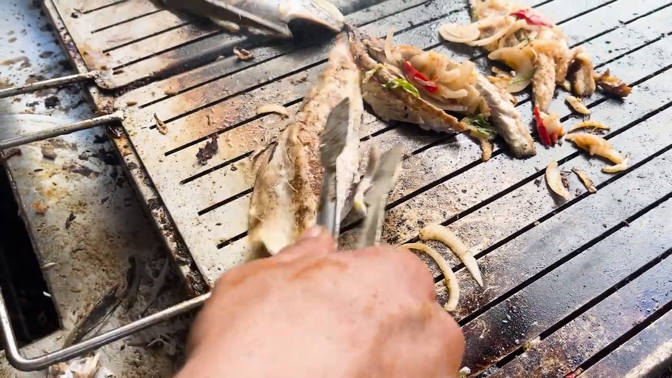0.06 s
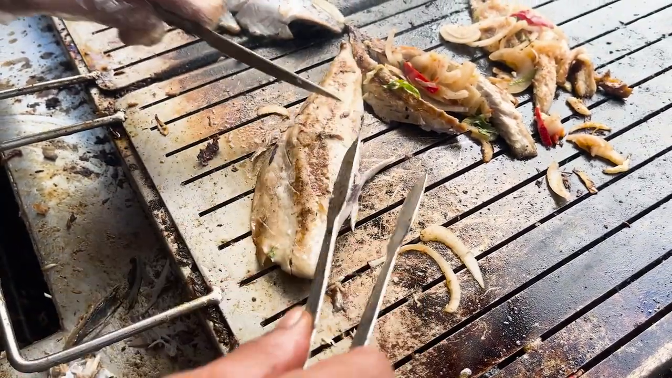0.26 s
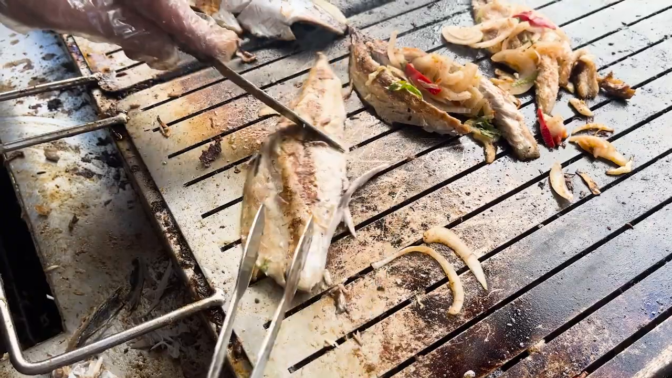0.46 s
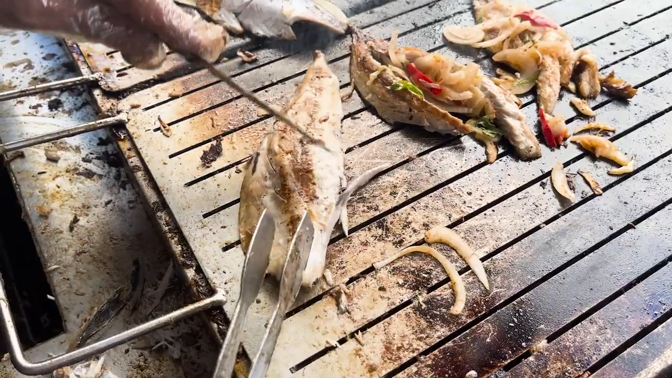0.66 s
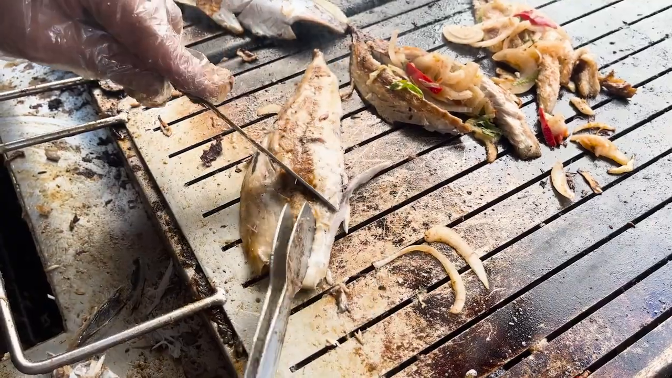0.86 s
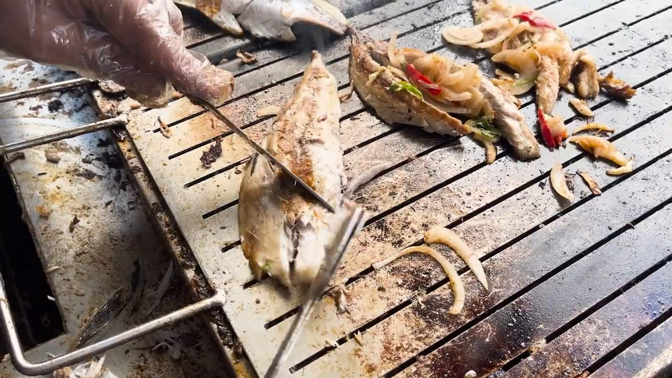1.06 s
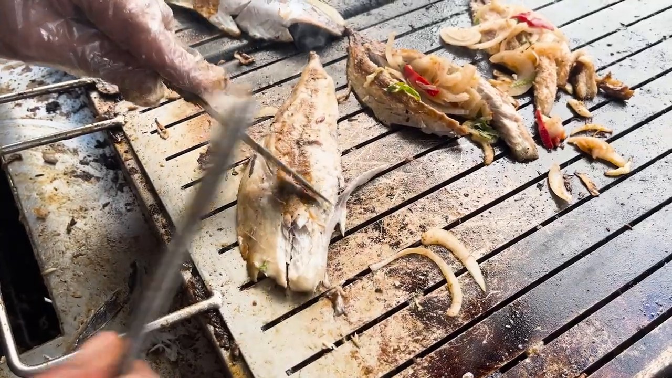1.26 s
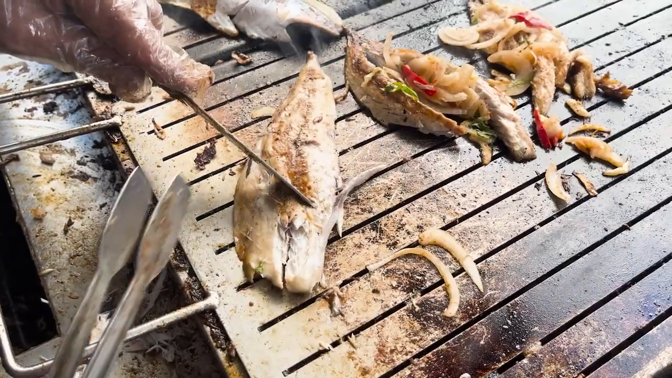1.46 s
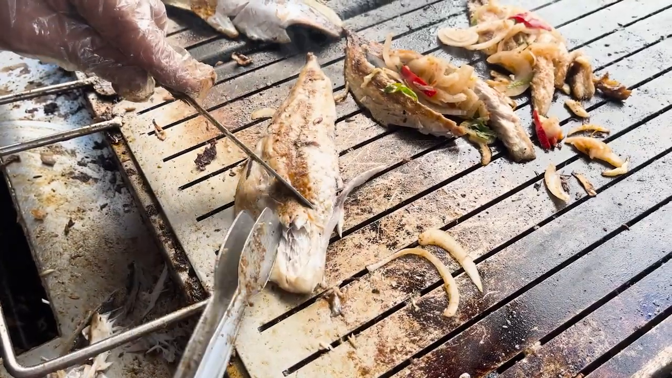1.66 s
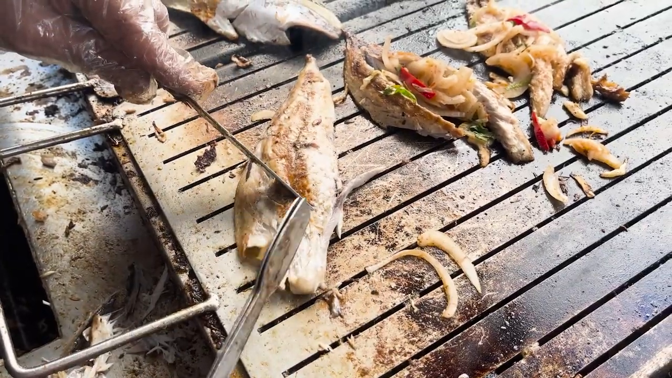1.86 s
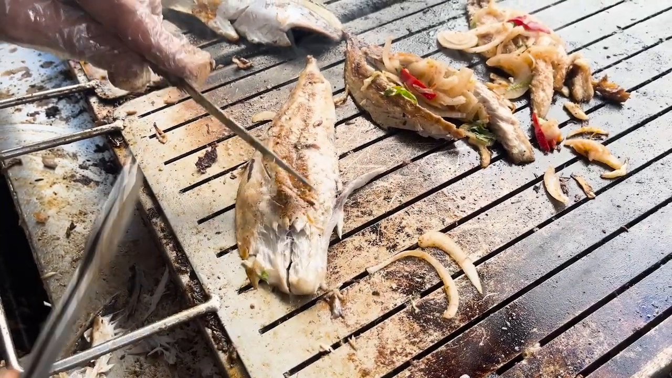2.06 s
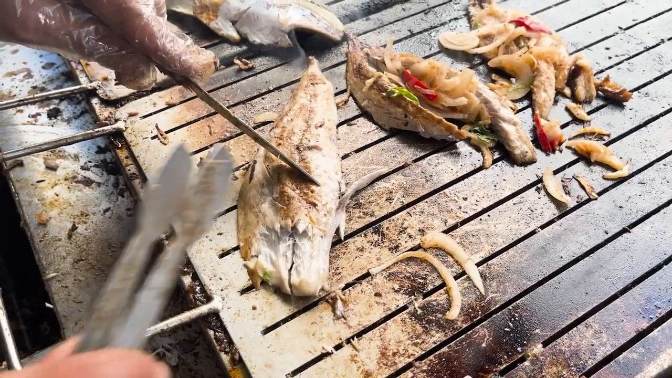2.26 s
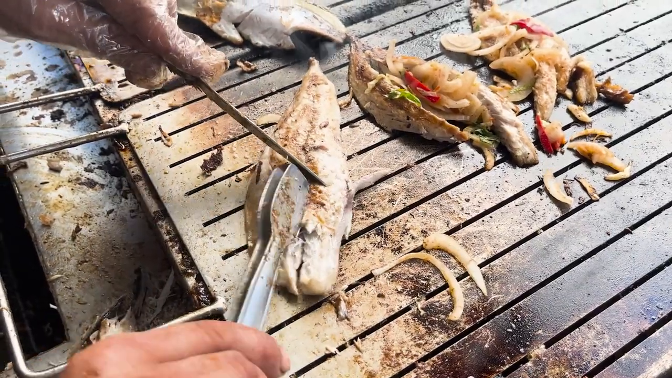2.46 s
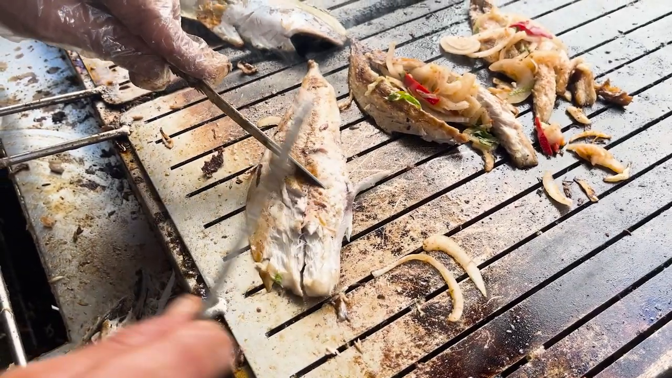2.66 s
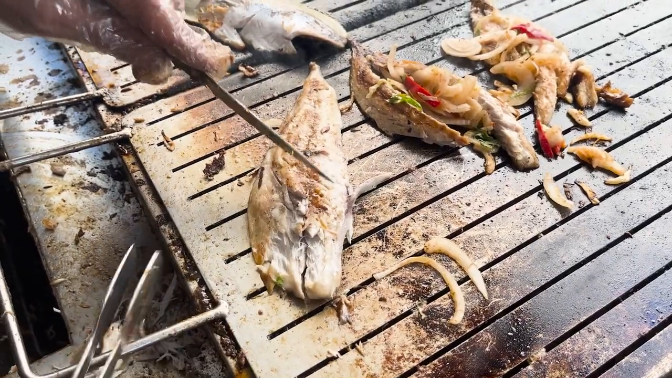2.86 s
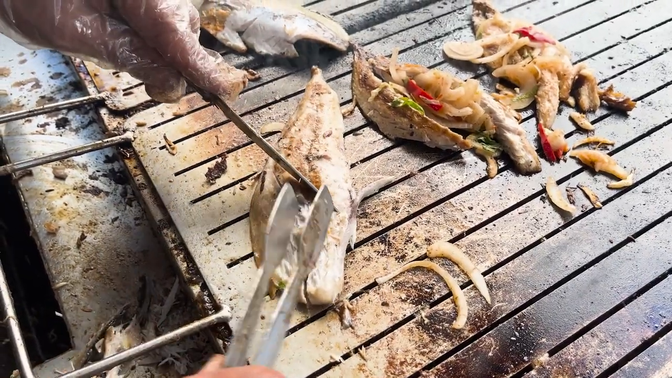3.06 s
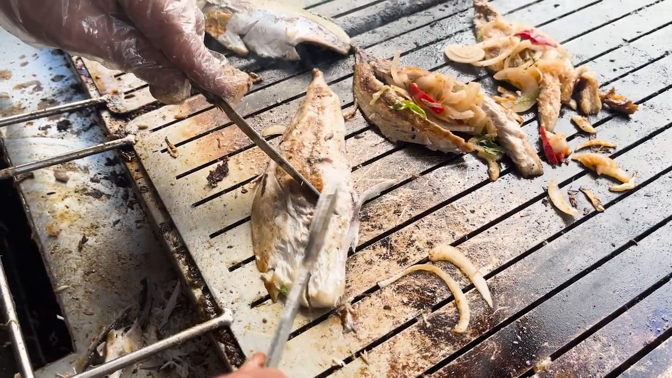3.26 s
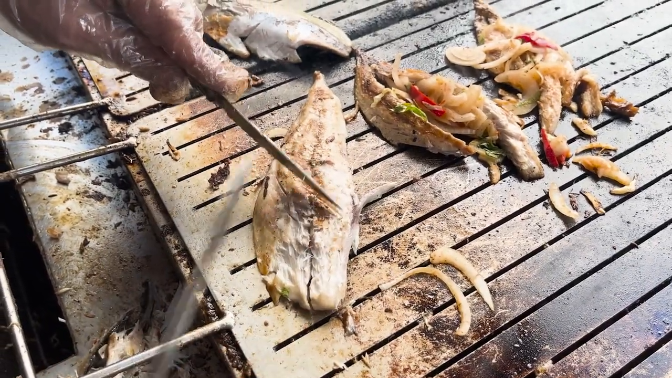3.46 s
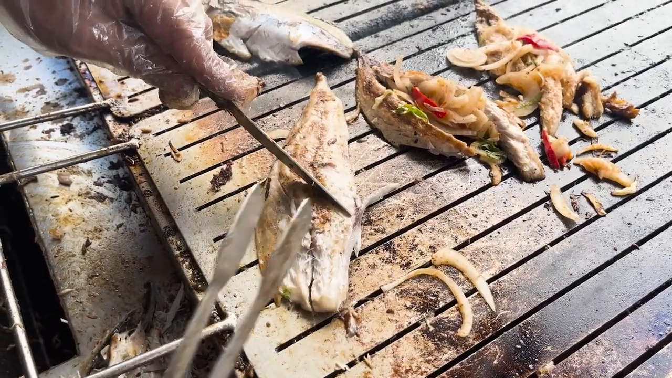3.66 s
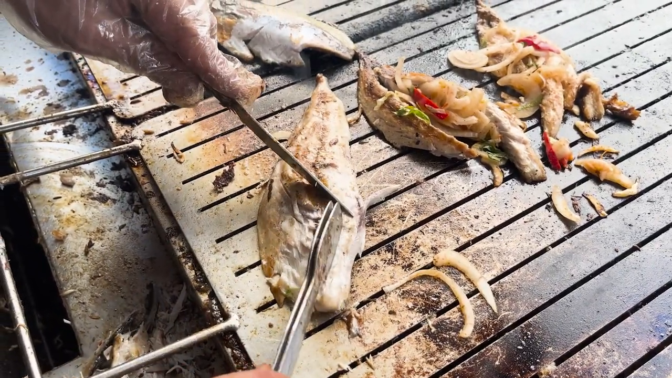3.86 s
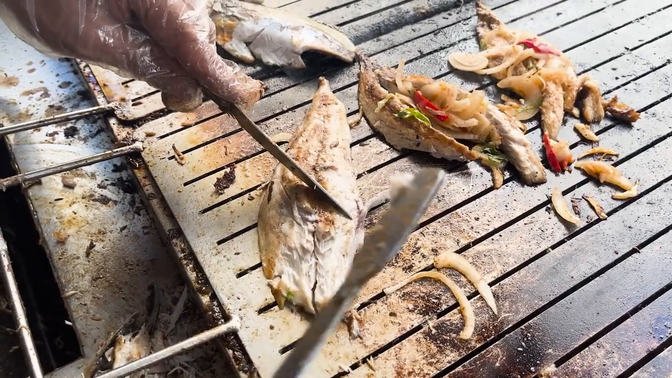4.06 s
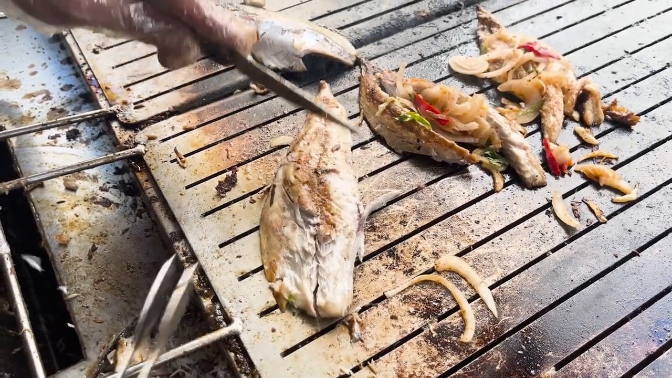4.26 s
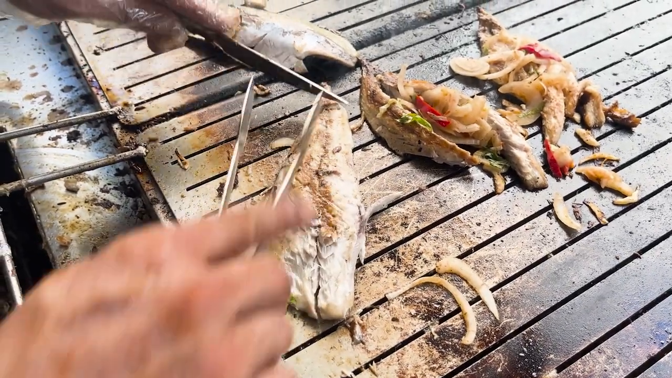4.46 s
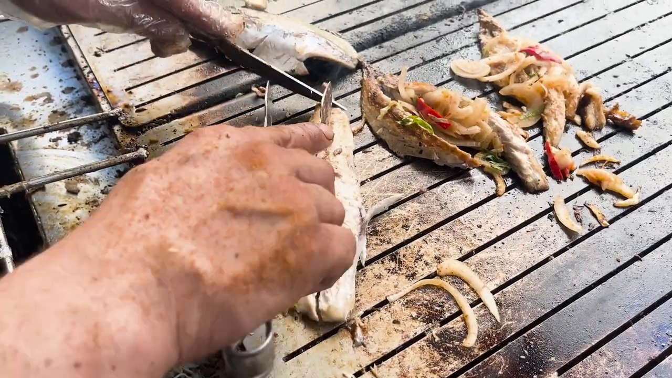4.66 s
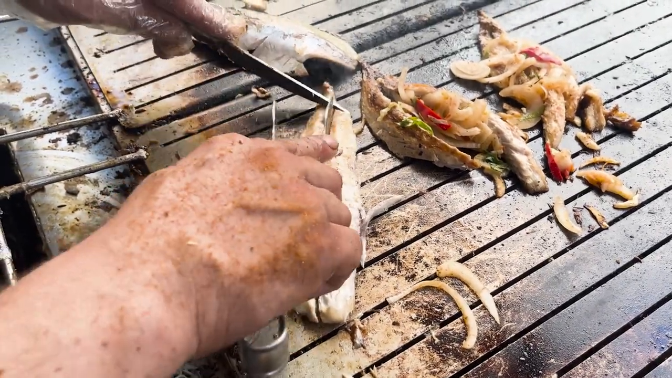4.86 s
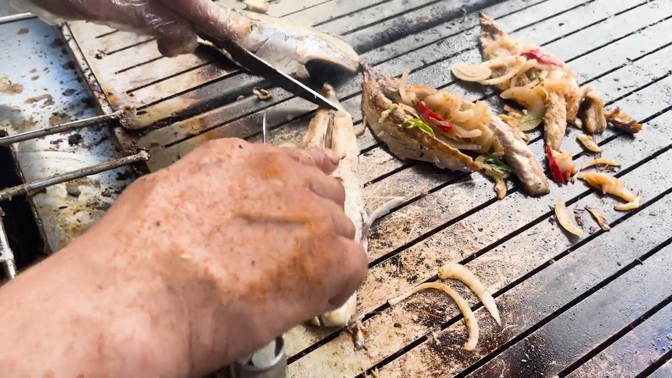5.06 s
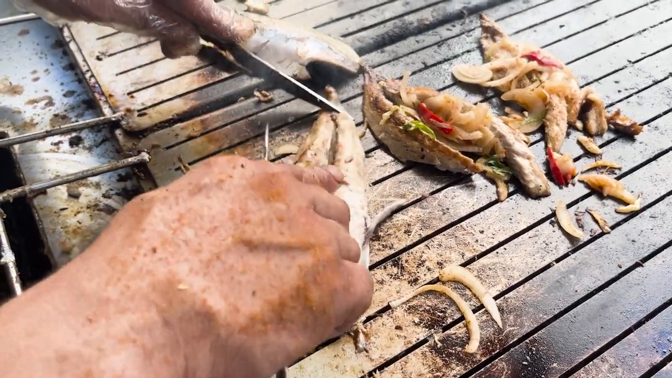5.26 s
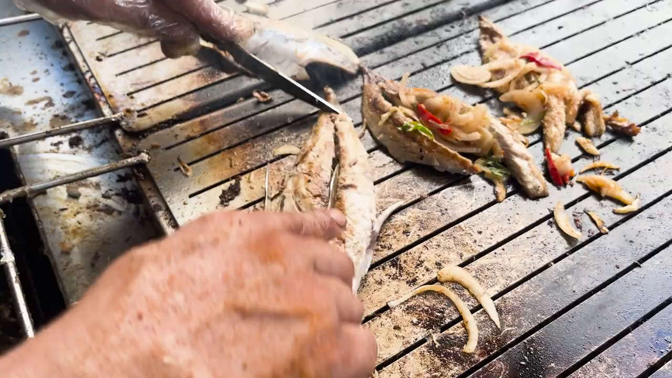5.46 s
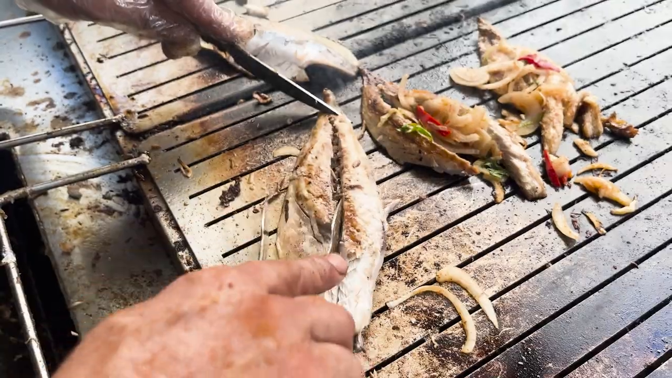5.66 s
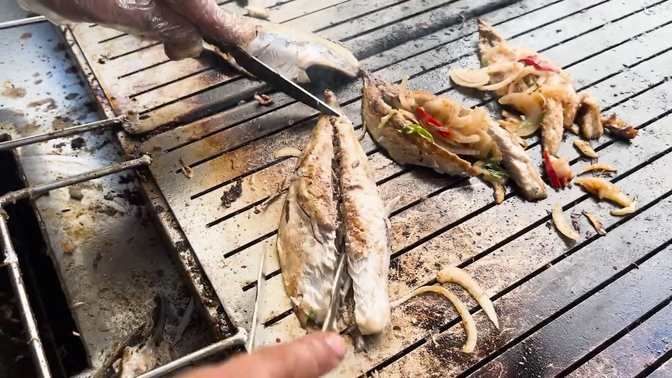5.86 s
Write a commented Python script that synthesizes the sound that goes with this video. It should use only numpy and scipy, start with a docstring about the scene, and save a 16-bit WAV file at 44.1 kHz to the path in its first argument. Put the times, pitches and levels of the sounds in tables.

```python
"""Spring tongs snap shut again and again as fish is split on a steel griddle grate, heard close by.
Each snap is a burst of clattering steel modes and ringing arms; a limiter squashes it.
A knife and the tong tips knock on the grate as noise bursts over ringing modes; drags rasp, one squeaks.
Fat sizzles as dense random grains over hiss, amid sharp bright ticks, of spitting fat or of steel.
Beneath lie a fan's wavering lines and rumble and the dull noise of the street."""
import sys
import numpy as np
from scipy import signal
from scipy.fft import rfft, irfft
from scipy.io import wavfile
from scipy.ndimage import uniform_filter1d, minimum_filter1d

SR = 44100
rng = np.random.default_rng(int(sys.argv[2]) if len(sys.argv) > 2 else 0)


def generate_wav(signal):
    """Clip the signal to [-1, 1] and save it as 16-bit WAV at the path in sys.argv[1]."""
    frames = np.transpose(np.atleast_2d(signal))
    scaled = np.clip(frames, -1, 1) * 32767
    pcm = np.round(scaled).astype(np.int16)
    wavfile.write(sys.argv[1], SR, pcm)


N = 261072
TIME = np.arange(N) / SR
HIT = 16000  # samples that one blow lasts
AGE = np.arange(HIT) / SR  # seconds since the blow

# Levels are relative, ahead of the stereo balance and limiter; every colour has its overall level set apart.

# groups of tong modes that the point of contact favours or mutes: pitch_hz
CONTACT_HZ = (780, 1400, 1780, 2250, 2800, 5200, 7000, 11000)
# tongs snapping shut: start_s, level_db, rattle_delay_s, rattle_db (against the snap),
# singing_mode_hz, singing_lift_db, then one contact_db for each group in CONTACT_HZ
SNAPS = [(0.009, -25, .003, -6, 1305, 11, -11, 5, 3, -15, -10, -2, 8, 5),
         (1.3573, -5.5, 0.0038, 5.5, 2262, 5.8, 1, 2.5, 0, 0.5, -7, -4, 3, 0),
         (2.11, -6, 0.0013, 5, 1700, 2.7, -5, 3, 1, 3.5, -6, -2.5, 0, 4.5),
         (2.823, -5, 0.0017, 4.5, 2262, 6.1, -2.5, 3.5, -8, 0.5, -9.5, -6, 0.5, -3.5),
         (3.526, -8, 0.0019, 9.5, 5388, 6.3, -0.5, -0.5, 1, -15, -2, 2, 0, 0.5),
         (4.204, -4.5, 0.0033, 9.5, 1785, 2.5, -4.5, 2, 1.5, -4.5, -1, -7, 3, -2.5)]
# ring of the tong arms, before contact and chance: pitch_hz, level_db, t60_s
TONG_MODES = [(692, -28, 0.27), (770, -21, 0.26), (836, -21, 0.15), (1050, -34, 0.26), (1342, -25, 0.28),
              (1402, -17, 0.14), (1490, -20, 0.14), (1702, -20, 0.14), (1804, -16.5, 0.25),
              (1873, -23, 0.19), (1960, -23, 0.15), (2122, -15, 0.14), (2220, -24, 0.2), (2357, -34, .16),
              (2480, -24, 0.11), (2744, -15, 0.16), (2920, -14, 0.16), (3100, -43, 0.17),
              (4456, -24.5, 0.2), (5020, -16, .12), (5388, -22, 0.2), (5610, -30, .13), (6360, -19.5, 0.15),
              (7044, -14.5, 0.087)]
# dense clatter of the thin steel: pitch_hz, density_db (per Hz)
CLATTER_COLOUR = [(150, 3.5), (280, -29), (520, -15), (780, -3.5), (1120, -16), (1450, 4), (1800, 2.5),
                  (2200, 0), (2750, -1.5), (3400, -9.5), (4400, -10.5), (5400, -3.5), (8000, -9.5),
                  (12000, -4.5), (16000, -17.5)]
# knife and tong tips on the grate: start_s, level_db, hardness_db (treble gained and bass lost),
# clack_db, t60_s (of the thud and clack), favoured_pitch_hz
KNOCKS = [(2.369, -38.5, -1.5, 9.5, 0.063, 1900), (2.672, -35.5, -7, 5.5, 0.032, 850),
          (2.73, -26.5, -1.5, 7.5, 0.11, 1300), (3.006, -37, -2.5, -3, 0.044, 1270),
          (3.897, -43, -6.5, 0, .06, 1300), (3.993, -29.5, -3.5, 3, 0.21, 1280),
          (4.024, -39.5, -6, 7, .06, 1750), (4.9222, -29, -11, 1.5, 0.047, 850),
          (5.0203, -34, -4.5, 6, 0.048, 1770), (5.024, -38.5, -10.5, -12, 0.043, 684),
          (5.126, -37.5, -13.5, -2, 0.068, 724), (5.143, -27.5, 0, -7, 0.055, 720),
          (5.275, -39, 6.5, -1, 0.076, 1250), (5.321, -29, 1.5, -0.5, 0.051, 1740),
          (5.482, -21.5, 5, -4.5, 0.068, 1740), (5.621, -26.5, 6, -3, 0.062, 1700),
          (5.764, -21, 5, -4.5, 0.04, 460), (5.882, -34, 3, 4.5, 0.01, 1760)]
# ring of the grate, before the favoured pitch and chance: pitch_hz, level_db, t60_s
GRATE_MODES = [(474, -3.5, 0.13), (596, -7.5, 0.11), (720, -13, 0.15), (940, -7, 0.073), (1200, -10, 0.16),
               (1590, -13, 0.035), (1740, -7, 0.11), (2626, -11, 0.066)]
# the three parts of a knock (the thud also serves the tongs): pitch_hz, density_db (per Hz)
THUD_COLOUR = [(120, 0.5), (290, 5), (450, 0), (800, -6), (1700, -3.5), (3000, -10), (8000, -18.5)]
CLACK_COLOUR = [(600, -19), (2000, 5.5), (5500, 4.5), (7500, 4.5), (11000, -5.5)]
TICK_COLOUR = [(3000, -52), (7000, -4.5), (11000, 1), (16000, -9)]
# steel dragged over the grate: start_s, end_s, level_db (at the middle)
SCRAPES = [(0.644, 0.765, -41.5), (2.594, 2.775, -32), (3.578, 3.76, -42.5), (3.886, 4.157, -38),
           (4.346, 4.473, -42), (4.862, 4.936, -38)]
# rasp of a scrape: pitch_hz, density_db (per Hz)
SCRAPE_COLOUR = [(200, 4), (550, 14), (1300, 5.5), (2800, -4), (7000, -18), (15000, -49)]
# sharp bright ticks, of spitting fat or of steel: start_s, peak_db, t60_s
BRIGHT_TICKS = [(.066, -6, 0.0046), (1.148, -10, 0.004), (2.428, -9.5, 0.006), (2.493, -8, .004),
                (2.5165, -6.5, 0.0031), (3.461, -15.5, .008), (3.483, -16, .007), (4.545, -6, 0.005),
                (5.214, -19, .004)]
# colour of a bright tick: pitch_hz, density_db (per Hz)
BRIGHT_COLOUR = [(1500, -6), (5000, -20), (8000, 16), (11500, 11), (16000, 11)]
# colours of the sizzle, the fan's rumble and the street: pitch_hz, density_db (per Hz)
SIZZLE_COLOUR = [(1000, -22), (2500, -5.5), (5000, -3.5), (7000, 2), (9000, 5), (11000, 6.5), (14000, 2.5),
                 (16000, -4.5)]
RUMBLE_COLOUR = [(18, -26), (27, -25), (36, -1), (60, 3), (90, 1.5), (130, -8.5), (165, -0.5), (200, -15),
                 (400, -30)]
STREET_COLOUR = [(100, 0), (300, -0.5), (500, -3), (900, -9.5), (1500, -12.5), (2200, -18.5), (6000, -61),
                 (14000, -21)]
# sizzling fat, before the trim and slow swell: time_s, level_db
FRYING = [(0.0, -35.5), (0.26, -38.5), (2.7, -39.5), (2.85, -45.5), (3.86, -45.5), (4.44, -40),
          (4.68, -38.5), (5.92, -43)]
# fan lines: pitch_hz, level_db, width_hz (rate of their waver)
FAN_LINES = [(64.5, -37.5, 8.3), (99.3, -42.5, 3.2), (161.8, -44, 16.4), (228, -50.5, 4.6),
             (314.6, -53.5, 28), (462, -55, 12.5)]
# low bumps and faint hollow tones that come and go: middle_s, pitch_hz (before the waver), level_db, length_s
SWELLS = [(1.698, 64.2, -20.5, .1), (1.786, 280, -31, 0.048), (2.36, 66.6, -26.5, .16),
          (2.846, 71, -15.5, .05), (3.013, 364.4, -30, .12), (3.322, 320, -35, .08),
          (3.728, 335.5, -34.5, .17), (3.99, 88, -15, .06)]
# microphone pair, likeness of diffuse sound: pitch_hz, likeness (0 to 1)
LIKENESS = [(60, 1), (150, 0.96), (350, 0.52), (800, 0.012), (1400, 0.015), (2000, 0.83), (3800, 0.21),
            (5500, 0.38), (7800, 1), (15000, 1)]
# microphone pair, level balance: pitch_hz, left_minus_right_db
BALANCE = [(60, 2), (200, 2.5), (750, 3.5), (1400, 1), (2400, 2), (4300, 7), (7500, 0.5), (15000, -0.5)]
# microphone pair, phase: pitch_hz, left_lead_rad
PORT_PHASE = [(20, 0), (400, .15), (700, .8), (1300, -.9), (1800, .3), (3200, 1.1), (4900, .7), (5800, -1),
              (7200, -1.9), (8000, -3), (8700, -3.3), (11500, -6.2), (12400, -6.4), (15600, -9.4)]

CLATTER_T60_S, STALL_T60_S = 0.035, 0.21
CUTOFF_HZ = 15750
# small random spits: average number a second, typical peak above the sizzle and its spread
SPITS_PER_S, SPIT_OVER_DB, SPIT_SPREAD_DB = 6, 18.5, 3
# the fan's rumble starts at this level and eases off steadily
RUMBLE_DB, RUMBLE_FALL_DB_PER_S = -32, 1.0
# a short echo of each snap off a near surface, at a level against that snap
ECHO_S, ECHO_DB = 0.017, -9.5
# the blade squeaks once on a bar; the pitch rises most under the greatest pressure
SQUEAK_S, SQUEAK_LENGTH_S, SQUEAK_DB = 5.416, 0.031, -36
SQUEAK_HZ, SQUEAK_RISE_HZ = 1050, 300


def from_db(db):
    """Decibels to gain."""
    return 10 ** (np.asarray(db) / 20)


def rms_one(x):
    """Scale to rms 1."""
    return x / np.sqrt(np.mean(x ** 2) + 1e-20)


def at_hz(points, hz):
    """Read a table on a log-frequency axis."""
    known_hz, values = np.transpose(points)
    return np.interp(np.log(hz + 1e-3), np.log(known_hz), values)


def bins(size):
    """Frequencies of an FFT of this size."""
    return np.fft.rfftfreq(size, 1 / SR)


def coloured(x, spectrum):
    """Give x a spectrum; rms 1."""
    size = x.shape[-1]
    gain = from_db(at_hz(spectrum, bins(size)))
    return rms_one(irfft(rfft(x) * gain, size))


def diffuse(spectrum, size):
    """Stereo noise from all sides: the ports share more of it where their likeness is high; rms 1."""
    mid, side = rfft(rng.standard_normal((2, size)))
    alike = np.clip(at_hz(LIKENESS, bins(size)), 0, .999)
    shared = np.sqrt(1 + alike) * mid
    opposed = np.sqrt(1 - alike) * side * [[1], [-1]]
    return coloured(irfft(shared + opposed, size), spectrum)


def drift(rate_hz):
    """Slow chance with rms 1, made of noise that fades out above rate_hz."""
    slowness = (1 + (bins(N) / rate_hz) ** 2) ** 2
    return rms_one(irfft(rfft(rng.standard_normal(N)) / slowness, N))


def decay(t60):
    """Envelope of one blow that falls 60 dB in t60 seconds."""
    return from_db(-60 * AGE / max(t60, 1e-3))


def add(out, s, sound):
    """Mix a sound in at time s."""
    start = max(round(s * SR), 0)
    out[:, start:start + sound.shape[-1]] += sound[..., :N - start]


def blow(spectrum, t60, room_db, colour=((1000, 0),), uneven_db=4.0, cluster_hz=55):
    """A burst of clustered steel modes, coloured by the contact, then the stall's short reverberation."""
    cluster_centres = np.arange(50, SR / 2, cluster_hz)
    chance = np.clip(rng.standard_normal(1000)[:len(cluster_centres)], -2, 2)
    lumps_db = uneven_db * chance * np.minimum(cluster_centres / 2800, 1)  # smoother in the bass
    hz = bins(HIT)[1:]
    density_db = at_hz(spectrum, hz) + np.interp(hz, cluster_centres, lumps_db) + at_hz(colour, hz)
    clustered = np.column_stack([hz, density_db])
    direct = coloured(rng.standard_normal(HIT), clustered) * decay(t60) * (1 - decay(0.00076))
    room = diffuse(clustered, HIT) * decay(STALL_T60_S) * (1 - decay(0.048))
    return direct + from_db(room_db) * room


def ring(modes, colour, spread_db, detune, port_spread=1.0):
    """The point of contact sets how hard each mode rings; reflections shift its phase between the ports."""
    hz, level_db, t60 = np.transpose(modes)
    gain = from_db(level_db + at_hz(colour, hz) + spread_db * rng.standard_normal(len(hz)))
    hz = hz * (1 + detune * rng.standard_normal(len(hz)))
    phase = rng.uniform(0, 2 * np.pi, (len(hz), 1))
    phase = phase + port_spread * rng.standard_normal((2, len(hz), 1))
    tails = np.array([g * decay(t) for g, t in zip(gain, t60)])
    return np.sum(tails * np.sin(2 * np.pi * hz[:, None] * AGE + phase), axis=1)


def hum(rumble_db, street_db=-42, waver=0.062):
    """Fan lines with wavering level and phase, and hollow swells, over rumble and the street's dull wash."""
    rumble = from_db(rumble_db) * diffuse(RUMBLE_COLOUR, N)
    street = from_db(street_db + 1.8 * drift(30)) * diffuse(STREET_COLOUR, N)
    out = rumble + street
    for hz, level_db, width_hz in FAN_LINES:
        turn = 2 * np.pi * hz * TIME
        line = drift(width_hz) * np.cos(turn) + drift(width_hz) * np.sin(turn)
        out = out + from_db(level_db) * line
    bend = 1 + waver * drift(104)
    for middle_s, hz, level_db, length_s in SWELLS:
        size = max(int(length_s * SR), 2)
        pitch_hz = hz * bend[int(middle_s * SR):][:size]
        tone = np.sin(2 * np.pi * np.cumsum(pitch_hz) / SR)
        add(out, middle_s - length_s / 2, from_db(level_db) * np.hanning(size) * tone)
    return out


def sizzle(level_db, per_s=1800, size_db=5.5, grain_db=-3, hiss_db=0):
    """Tiny bursts of steam in the fat, in clumps, over the hiss of countless smaller ones."""
    born = rng.random(N) < per_s * from_db(4 * drift(25)) / SR
    sizes = from_db(size_db * np.minimum(rng.exponential(1, N), 4.5)) * rng.choice([-1, 1], N)
    grains = from_db(grain_db) * coloured(born * sizes, SIZZLE_COLOUR)
    hiss = from_db(hiss_db + 2.3 * drift(32)) * diffuse(SIZZLE_COLOUR, N)
    return from_db(level_db) * (grains + hiss)


def tong_resonances(width_hz=26, valley_db=-12.0):
    """The clatter gathers around the modes of the arms, with dark valleys between: pitch_hz, level_db."""
    hz = np.arange(500, 7500, 15)
    power = from_db(valley_db) ** 2
    for mode_hz, _, _ in TONG_MODES:
        mode_width_hz = width_hz * np.sqrt(mode_hz / 2000)
        power = power + 1 / (1 + ((hz - mode_hz) / mode_width_hz) ** 2) ** 2
    return hz, 10 * np.log10(power / uniform_filter1d(power, size=50))  # against the local average


def tongs(room_db=-17, ring_db=2.0, thud_db=-13.5, close_s=0.0042, rattle_t60=0.026,
          sing_width_hz=35, lead_in_s=0.007, lead_in_db=-10, lead_in_clatter_db=-8):
    """A soft, quickly swelling onset leads into each snap; the tips rattle, an echo follows, the arms ring."""
    out = np.zeros((2, N))
    grid_hz, resonance_db = tong_resonances()
    for s, level_db, rattle_s, rattle_db, sing_hz, sing_db, *contact_db in SNAPS:
        contact = list(zip(CONTACT_HZ, contact_db))

        def lift(hz):
            """Decibels added close to the singing mode."""
            return sing_db * (abs(hz - sing_hz) < sing_width_hz)

        colour_db = at_hz(contact, grid_hz) + resonance_db + lift(grid_hz)
        colour = [*zip(grid_hz, colour_db), contact[-1]]
        lifted_modes = [(hz, db + lift(hz), t60) for hz, db, t60 in TONG_MODES]
        arms = from_db(ring_db) * ring(lifted_modes, contact, spread_db=1.0, detune=0.0014)
        thud = from_db(thud_db) * blow(THUD_COLOUR, t60=0.041, room_db=6.5)
        clatter = blow(CLATTER_COLOUR, CLATTER_T60_S, room_db, colour)
        soft_clatter = from_db(lead_in_clatter_db) * blow(CLATTER_COLOUR, CLATTER_T60_S, room_db, colour)
        lead_in = (soft_clatter + arms) * (1 - decay(0.019))
        closing = (clatter + arms + thud) * (1 - decay(close_s))
        rattle = blow(CLATTER_COLOUR, rattle_t60, room_db=-31, colour=colour)
        echo = blow(CLATTER_COLOUR, t60=0.055, room_db=-7.0, colour=colour)
        add(out, s - lead_in_s, from_db(level_db + lead_in_db) * lead_in)
        add(out, s, from_db(level_db) * closing)
        add(out, s + rattle_s, from_db(level_db + rattle_db) * rattle)
        add(out, s + ECHO_S, from_db(level_db + ECHO_DB) * echo)
    return out


def bright_ticks(sizzle_db, small_t60=0.0023):
    """Sharp bright ticks, of spitting fat or of steel, and small random spits that grow with the sizzle."""
    out = np.zeros((2, N))
    born = np.flatnonzero(rng.random(N) < SPITS_PER_S / SR)
    small_db = sizzle_db + SPIT_OVER_DB + SPIT_SPREAD_DB * rng.standard_normal(N)
    small_spits = [(TIME[i], small_db[i], small_t60) for i in born]
    for s, peak_db, t60 in [*BRIGHT_TICKS, *small_spits]:
        tick = coloured(rng.standard_normal(HIT), BRIGHT_COLOUR) * decay(t60)
        add(out, s, from_db(peak_db) * tick / np.abs(tick).max())
    return out


def scrapes(slip_db=3):
    """Each stroke swells and fades while the edge sticks and slips, heard as noise of uneven level."""
    pressure = np.zeros(N)
    for start_s, end_s, level_db in SCRAPES:
        progress = np.clip((TIME - start_s) / (end_s - start_s), 0, 1)
        pressure += from_db(level_db) * np.sin(np.pi * progress)
    stick_slip = rms_one(from_db(slip_db * drift(97)))
    return pressure * stick_slip * diffuse(SCRAPE_COLOUR, N)


def knocks(dull_db=-6.0, ring_db=0.5, tick_db=1.0, crack_db=3, crack_t60=0.041,
           favour_db=5.5, favour_ratio=1.25, build_s=0.0089):
    """Through the flesh the blade thuds, its edge clacks on the bars, and bare steel cracks and ticks."""
    out = np.zeros((2, N))
    for s, level_db, hard_db, clack_db, t60, pitch_hz in KNOCKS:
        colour = [(pitch_hz / favour_ratio, 0), (pitch_hz, favour_db), (pitch_hz * favour_ratio, 0)]
        grate = ring(GRATE_MODES, colour, spread_db=0.0, detune=0.016) * (1 - decay(build_s))
        thud = blow(THUD_COLOUR, t60, room_db=1.5, colour=colour, uneven_db=-2.5)
        body = from_db(dull_db) * thud + from_db(ring_db) * grate
        clack = from_db(clack_db) * blow(CLACK_COLOUR, t60, room_db=-4.5, uneven_db=4.5)
        tick = from_db(tick_db) * blow(TICK_COLOUR, t60, room_db=-15.0)
        crack = from_db(crack_db) * coloured(rng.standard_normal(HIT), TICK_COLOUR) * decay(crack_t60)
        knock = from_db(-hard_db) * body + clack + from_db(hard_db) * (tick + crack)
        add(out, s, from_db(level_db) * knock)
    return out


def squeak(rough_hz=240):
    """Fast, uneven slips of the edge; their rate rises and falls with the pressure."""
    pressure = np.sin(np.pi * np.clip((TIME - SQUEAK_S) / SQUEAK_LENGTH_S, 0, 1))
    hz = SQUEAK_HZ + SQUEAK_RISE_HZ * pressure + rough_hz * drift(385)
    return from_db(SQUEAK_DB) * pressure * np.sin(2 * np.pi * np.cumsum(hz) / SR)


def scene(sizzle_trim_db=1.0, swell_db=-0.1):
    """Tongs and knife at work over the fan and the frying fat, whose sizzle swells and ebbs."""
    frying_db = np.interp(TIME, *np.transpose(FRYING))
    sizzle_db = frying_db + sizzle_trim_db + swell_db * drift(5.0)
    rumble_db = RUMBLE_DB - RUMBLE_FALL_DB_PER_S * TIME
    stall = hum(rumble_db) + sizzle(sizzle_db)
    return stall + tongs() + bright_ticks(sizzle_db) + scrapes() + knocks() + squeak()


def limiter(x, top_db=-4.5, hold_s=0.0059, release_db_per_s=1100, slow_share=0.12, slow_db_per_s=45):
    """Peaks pull the gain down at once; most of it returns after a short hold, the rest slowly."""
    over_db = np.maximum(20 * np.log10(np.abs(x).max(axis=0) + 1e-9) - top_db, 0)
    size = max(int(hold_s * SR), 3)
    held = -minimum_filter1d(-over_db, size, origin=(size - 1) // 2)  # highest of the recent peaks

    def release(db_per_s):
        """Follow rises at once and fall at a steady rate."""
        return np.maximum.accumulate(held + db_per_s * TIME) - db_per_s * TIME

    reduction_db = (1 - slow_share) * release(release_db_per_s) + slow_share * release(slow_db_per_s)
    return x * from_db(-uniform_filter1d(reduction_db, size=24))


def record(dry):
    """The two microphone ports differ in level and phase; then the limiter and a steep treble cut-off."""
    hz, sides = bins(N), np.array([[.5], [-.5]])
    level = from_db(sides * at_hz(BALANCE, hz))
    phase = sides * np.interp(hz, *np.transpose(PORT_PHASE))
    stereo = irfft(rfft(dry) * level * np.exp(1j * phase), N)
    limited = np.clip(limiter(stereo), -1, 1)
    cutoff = signal.ellip(12, .1, 90, CUTOFF_HZ, fs=SR, output="sos")
    return signal.sosfilt(cutoff, limited)


dry = scene()
out = record(dry)
generate_wav(out)
```